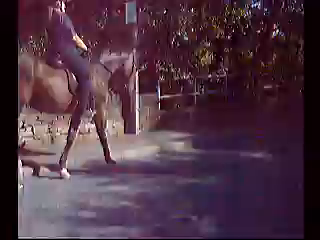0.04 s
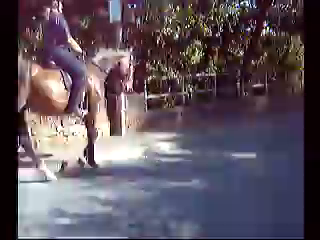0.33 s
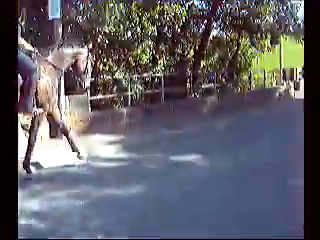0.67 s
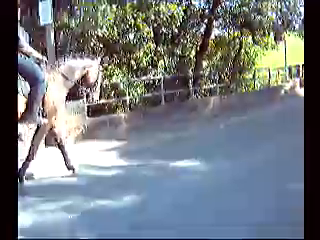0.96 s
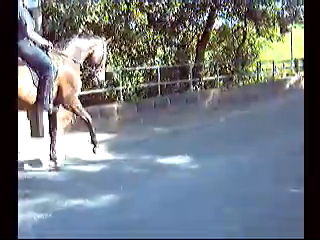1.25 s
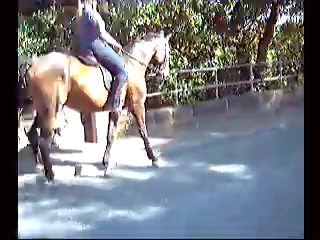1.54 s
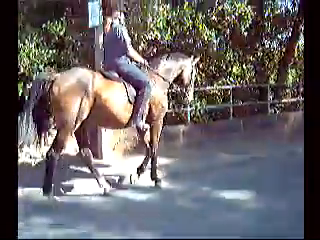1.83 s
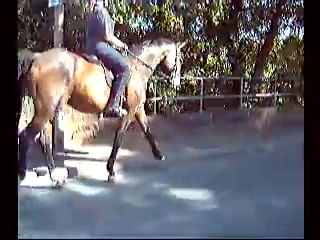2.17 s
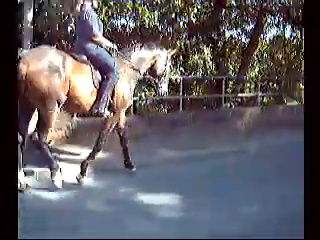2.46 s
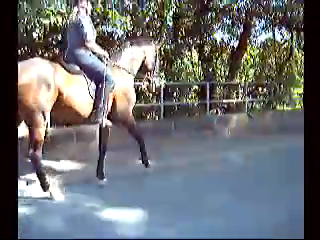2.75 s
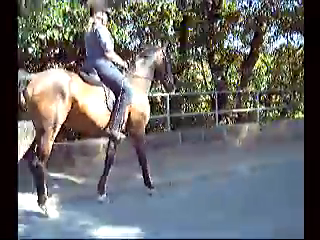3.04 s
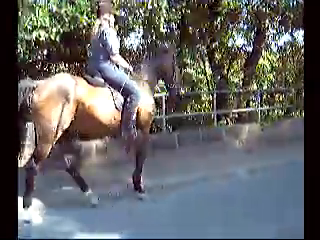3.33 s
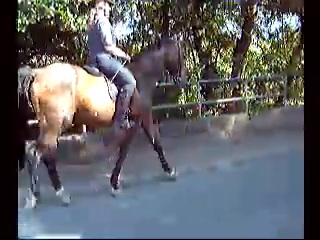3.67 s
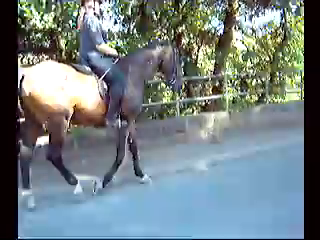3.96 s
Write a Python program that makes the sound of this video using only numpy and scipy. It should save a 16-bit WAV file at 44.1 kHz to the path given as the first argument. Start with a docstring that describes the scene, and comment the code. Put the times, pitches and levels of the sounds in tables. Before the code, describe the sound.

A horse walks on a paved lane, its shod hooves clopping unevenly. After an opening click and thump, wind buffets the microphone over faint rustling leaves. A loud wind thump comes midway, then the hoof steps continue over a quieter background.

```python
"""A click and a thump open the sound as a small camera's microphone comes on; then a horse walks a paved lane.
Each hoof lands in one or two gritty contacts that excite its hollow resonance; iron shoes snap on stone,
a hoof drags, and a low wall and trees scatter the sound. Turbulent wind buffets the microphone, leaves
rustle and a far bird whistles. After a loud wind thump the background drops away and creeps back."""
import sys
import numpy as np
from scipy import signal
from scipy.fft import rfft, irfft
from scipy.io import wavfile
from scipy.ndimage import uniform_filter1d

SR = 44100
rng = np.random.default_rng(int(sys.argv[2]) if len(sys.argv) > 2 else 0)


def file_out(sig):
    """Save sig as 16-bit WAV at sys.argv[1]."""
    # one column per channel
    cols = np.atleast_2d(sig).T
    # limit, then scale
    lim = np.clip(cols, -1, 1)
    pcm = np.round(lim * 32767).astype(np.int16)
    wavfile.write(sys.argv[1], SR, pcm)


N = 176400
T = np.arange(N) / SR

# spectrum of the circuit's hiss: f/Hz, relative density/dB
HISS_SPECTRUM = [(100, -3), (1000, 9), (3500, 0)]
# steady electronic whine: f/Hz, level/dB
WHINE_TONES = [(5536, -72.5), (11073, -76.5)]
# strength of the wind on the microphone: t/s, relative level/dB
BUFFET_LEVELS = [(.2, -26), (.39, -16.5), (.43, -11), (.53, -17), (.67, -28), (.765, -21.5), (.82, -34.5),
                 (.88, -24.5), (.98, -20.5), (1.35, -28.5), (1.42, -15.5), (1.52, -32.5), (1.62, -29.5),
                 (1.73, -20.5), (1.87, -16), (1.895, -44), (1.95, -27), (1.99, -90), (2.04, -33),
                 (2.22, -28), (2.34, -32.5), (2.53, -23.5), (2.64, -30), (3.05, -29), (3.41, -31.5),
                 (3.44, -17.5), (3.495, -18), (3.54, -31.5), (3.645, -19), (3.68, -31.5), (3.84, -34),
                 (3.88, -24.5), (3.95, -32)]
# spectrum of the buffeting: f/Hz, relative density/dB
BUFFET_SPECTRUM = [(20, -17), (45, -2.5), (85, 1.5), (150, -1), (280, -8), (430, -11), (650, -25.5),
                   (1200, -48), (3000, -56), (8000, -77)]
# deepest rumble of the wind: t/s, level/dB
RUMBLE_LEVELS = [(.2, -27), (.75, -23.5), (.9, -25), (1.3, -34), (2.1, -56), (3.3, -48), (4, -30.5)]
# leaves and distant outdoor noise: t/s, level/dB
LEAF_LEVELS = [(.2, -29.5), (.5, -32), (.9, -36.5), (1.87, -42), (1.91, -58.5), (3.3, -47), (4, -45.5)]
# spectrum of that noise: f/Hz, relative density/dB
LEAF_SPECTRUM = [(100, 5), (950, 3.5), (1400, -3.5), (2000, -10.5), (3200, -19), (4400, -31.5),
                 (10000, -40)]
# hoof contacts: t/s, crack level/dB, tilt/(dB per octave), contact time/s, ring level/dB, ring f/Hz
HOOF_CONTACTS = [(0.343, -19, 12, 0.0023, -11.5, 684), (0.3506, -15, 4.5, 0.013, -15, 770),
                 (0.383, -21.5, 4, 0.0076, -20.5, 920), (0.778, -20, -5, 0.006, -15, 890),
                 (0.7831, -12, 4, 0.0076, -14.5, 920), (0.793, -34, 0, 0.01, -22.5, 846),
                 (0.847, -22.5, 9, 0.012, -24, 930), (1.098, -26, 2, 0.006, -16.5, 930),
                 (1.11, -28.5, 3, 0.026, -27, 885), (1.4756, -17.5, 6.5, 0.0071, -19, 626),
                 (1.480, -13, 2, 0.0062, -10.5, 850), (1.693, -29.5, 2, 0.0049, -30.5, 1010),
                 (1.821, -36.5, -8, 0.01, -26, 993), (1.828, -22.5, 5.5, 0.01, -26, 1040),
                 (2.227, -35, 6, 0.011, -35.5, 613), (2.242, -33.5, 1, 0.007, -61, 890),
                 (2.527, -55, -2, 0.014, -28, 943), (2.9076, -27, 4.5, 0.014, -32.5, 680),
                 (3.211, -32, 7.5, 0.0055, -41, 960), (3.272, -38.5, -6, 0.017, -34.5, 962),
                 (3.2909, -24.5, 3.5, 0.0083, -23.5, 902), (3.4112, -22.5, 10, 0.0076, -22.5, 1524),
                 (3.539, -34, 5, 0.01, -33, 943), (3.653, -18.5, 6.5, 0.0092, -26, 902),
                 (3.661, -40, -4, 0.022, -23, 878), (3.727, -32.5, 1, 0.0092, -40, 1060)]
# resonances of hoof and road under the grit: f/Hz, bandwidth/Hz, relative level/dB
CONTACT_MODES = [(490, 190, -11.5), (639, 324, -3), (950, 130, -10), (1310, 260, -27.5), (1920, 190, -19.5),
                 (3000, 2500, -61)]
# an iron shoe striking stone: t/s, level/dB
SHOE_SNAPS = [(0.353, -28), (0.359, -28), (0.7837, -22.5), (.787, -22), (1.4749, -19), (1.4795, -19),
              (1.482, -37), (2.91, -32), (3.656, -25.5)]
# low wind thumps, several with a recorder tick: t/s, peak level/dB, f/Hz (decay in 1/(2f)), front time/s
WIND_THUMPS = [(0.4767, -10, 272, .0004), (0.9629, -25, 128, 0.000043), (1.3955, -26, 132, 0.000063),
               (1.8636, -23.5, 330, 0.000072), (1.8772, -5, 320, 0.00034)]
# far bird whistle: t/s, duration/s, starting f/Hz, level/dB
BIRD_WHISTLES = [(1.15, 0.17, 4120, -55.5)]
# a hoof dragging over grit: t/s, duration/s, level/dB
HOOF_SCUFFS = [(2.493, 0.099, -41.5), (2.591, 0.055, -46), (2.675, 0.016, -45.5)]

POWER_ON_S, MIC_ON_S, MIC_RISE_S = .0503, .2068, .0025
HOOF_TOP_HZ = 3710


def from_db(db):
    """Amplitude ratio of a level in decibels."""
    return 10 ** (np.asarray(db) / 20)


def rms_one(x):
    """Normalisation to unit mean power."""
    return x / np.sqrt(np.mean(x ** 2) + 1e-20)


def level(rows):
    """Gain over time, interpolated between points of t/s, level/dB."""
    return from_db(np.interp(T, *np.transpose(rows)))


def cut(x, hz, kind, order=2):
    """Butterworth low-pass or high-pass filter."""
    return signal.sosfilt(signal.butter(order, hz, kind, fs=SR, output="sos"), x)


def flutter(n, hz):
    """Random fluctuation of unit power: n samples of low-passed noise."""
    return rms_one(cut(rng.standard_normal(n), hz, "low"))


def resonate(x, hz, width_hz):
    """Forced response of a damped resonator with unit peak gain."""
    r = np.exp(-np.pi * width_hz / SR)
    feedback = [1, -2 * r * np.cos(2 * np.pi * hz / SR), r * r]
    return signal.lfilter(np.array([1, 0, -1]) * (1 - r * r) / 2, feedback, x)


def coloured(spectrum):
    """Stationary noise of unit power with the given spectral shape."""
    hz, db = np.transpose(spectrum)
    shape_db = np.interp(np.log(np.fft.rfftfreq(N, 1 / SR) + 1), np.log(hz), db)
    return rms_one(irfft(rfft(rng.standard_normal(N)) * from_db(shape_db), N))


def evened(x, seconds):
    """Division by the running RMS holds short-term power near one."""
    return x / np.sqrt(uniform_filter1d(x * x, int(seconds * SR)) + 1e-9)


def strike(t, rise_s, decay_s):
    """Exponential rise and decay, of height one."""
    shape = (1 - np.exp(-t / rise_s)) * np.exp(-t / decay_s)
    return shape / shape.max()


def add(out, start_s, x):
    """Superposition of x on out from the given time."""
    i = int(start_s * SR)
    out[i:i + len(x)] += x[:N - i]


def electronics():
    """Switching transients: power-on clicks and leaves offset, whine and hiss; the microphone thumps in."""
    powered = T > POWER_ON_S
    since_power, since_mic = np.maximum(T - POWER_ON_S, 0), np.maximum(T - MIC_ON_S, 0)
    click = from_db(-6.5) * np.exp(-since_power / .00012) * np.cos(2 * np.pi * 3160 * since_power)
    thump = from_db(-4.5) * strike(since_mic, MIC_RISE_S, decay_s=.097)
    whine = sum(from_db(db) * np.sqrt(2) * np.sin(2 * np.pi * hz * T) for hz, db in WHINE_TONES)
    hiss = from_db(-61) * coloured(HISS_SPECTRUM)
    offset = -.1
    return powered * (click + offset + whine + hiss) + thump


def wind(rumble_hz=73.4):
    """Turbulence: eddies vary the pressure at the microphone port, lumpy buffeting over a deep rumble."""
    lumps = from_db(3 * flutter(N, hz=22.4))
    buffet = evened(coloured(BUFFET_SPECTRUM), seconds=.0323) * lumps * level(BUFFET_LEVELS)
    rumble = cut(rng.standard_normal(N), rumble_hz, "low", order=4)
    rumble = evened(cut(rumble, rumble_hz / 2, "high"), seconds=.167)
    return from_db(-4) * buffet + rumble * level(RUMBLE_LEVELS)


def leaves():
    """Incoherent sources, leaves and the distant outdoors, sum to a broadband noise."""
    return coloured(LEAF_SPECTRUM) * level(LEAF_LEVELS)


def crunch(force, tilt_db, unevenness_db=4):
    """Random excitation: grit crushed in bursts drives the modes of hoof and road and adds a sizzle."""
    n, force_rms = len(force), np.sqrt(np.mean(force ** 2))
    bursts = force * from_db(unevenness_db * flutter(n, hz=SR / 100))
    body, pivot_hz = np.zeros(n), CONTACT_MODES[2][0]
    for hz, width_hz, db in CONTACT_MODES:
        mode = rms_one(resonate(bursts * rng.standard_normal(n), hz, width_hz))
        body += mode * from_db(db + tilt_db * np.log2(hz / pivot_hz))
    sizzle = rms_one(cut(bursts * rng.standard_normal(n), 3930, "high"))
    return force_rms * (cut(body, HOOF_TOP_HZ, "low", order=4) + from_db(tilt_db - 36.5) * sizzle)


def hooves(force_rise_s=.00064, settle_s=.0084):
    """Cavity resonance: each impact cracks on grit and rings the cupped hoof, falling as it settles."""
    cracks, rings, t = np.zeros(N), np.zeros(N), np.arange(SR // 10) / SR
    for start_s, crack_db, tilt_db, contact_s, ring_db, hz in HOOF_CONTACTS:
        force = (1 - np.exp(-t / force_rise_s)) * np.exp(-(t / contact_s) ** 2)
        add(cracks, start_s, from_db(crack_db) * crunch(force / force.max(), tilt_db))
        # a longer contact starts higher in pitch and rings longer
        pitch = hz * (1 + 16.2 * contact_s * np.exp(-t / settle_s))
        envelope = strike(t, rise_s=.0012, decay_s=.53 * contact_s)
        add(rings, start_s, from_db(ring_db) * envelope * np.sin(2 * np.pi * np.cumsum(pitch) / SR))
    return cracks, rings


def lane_reverb(x, t60_s=.24, top_hz=2330):
    """Diffuse reflection: the wall and trees return a short, dull tail."""
    t = np.arange(SR // 2) / SR
    tail = cut(rng.standard_normal(len(t)), top_hz, "low")
    tail *= strike(t, rise_s=.017, decay_s=t60_s / np.log(1000))
    tail *= np.sqrt(2 * top_hz / SR / np.sum(tail ** 2))  # about unit gain in the passband
    return from_db(-12.5) * signal.fftconvolve(x, tail)[:N]


def shoe_snaps(hz=2870, decay_s=.00042):
    """Damped free vibration: iron meets stone with an instant edge and a ping of a cycle or two."""
    out, t = np.zeros(N), np.arange(SR // 100) / SR
    for start_s, db in SHOE_SNAPS:
        add(out, start_s, from_db(db) * np.exp(-t / decay_s) * np.cos(2 * np.pi * hz * t))
    return out


def wind_thumps():
    """Bipolar pulses: low wind thumps, several with a sharp recorder tick at the front."""
    out, t = np.zeros(N), np.arange(-SR // 50, SR // 50) / SR
    for centre_s, db, hz, front_s in WIND_THUMPS:
        pulse = np.tanh(t / front_s) * np.exp(-np.abs(2 * hz * t))
        add(out, centre_s + t[0], from_db(db) * pulse / pulse.max())
    return out


def bird(arch_hz=247, waver_hz=75):
    """Frequency modulation: a thin, far whistle arches and wavers in pitch."""
    out = np.zeros(N)
    for start_s, length_s, hz, db in BIRD_WHISTLES:
        progress = np.clip((T - start_s) / length_s, 0, 1)
        pitch = hz + arch_hz * np.sin(2 * progress) + waver_hz * flutter(N, hz=240)
        out += from_db(db) * np.sin(np.pi * progress) * np.sin(2 * np.pi * np.cumsum(pitch) / SR)
    return out


def scuffs():
    """Sliding friction: a dragging hoof catches on the grit, which keeps its hollow sounding."""
    out, t = np.zeros(N), np.arange(SR // 5) / SR
    for start_s, length_s, db in HOOF_SCUFFS:
        force = np.sin(np.pi * np.minimum(t / length_s, 1))
        hollow = rms_one(resonate(rng.standard_normal(len(t)), hz=980, width_hz=110))
        drag = force * cut(hollow, HOOF_TOP_HZ, "low") + crunch(force, tilt_db=-1)
        add(out, start_s, from_db(db) * drag)
    return out


def scene():
    """Superposition of horse, leaves, bird and wind; only cracks, snaps and scuffs reverberate."""
    cracks, rings = hooves()
    gritty = cracks + shoe_snaps() + scuffs()
    return (leaves() + gritty + rings + lane_reverb(gritty) + bird() + wind() + wind_thumps())[None]


def record(dry, ceiling=.8, tick_period_s=.012, tick_limit=.16, cutoff_hz=13750):
    """Saturation and band limiting: the microphone opens late and rounds peaks; the circuit adds noise."""
    opening = (1 - np.exp(-np.maximum(T - MIC_ON_S, 0) / MIC_RISE_S)) ** 2
    mic = ceiling * np.tanh(dry / ceiling) * opening
    # faint periodic ticks of uneven strength ride on steep parts of the wave
    slope = np.diff(mic, prepend=0)
    on_tick = (T - .0035) % tick_period_s < 1 / SR
    ticks = slope * on_tick * from_db(24.5 + 4 * rng.standard_normal(N))
    ticks = cut(tick_limit * np.tanh(ticks / tick_limit), 4080, "low", order=1)
    band_limit = signal.ellip(10, .2, 80, cutoff_hz, fs=SR, output="sos")
    return signal.sosfilt(band_limit, mic + ticks + electronics())


dry = scene()
out = record(dry)
file_out(out)
```